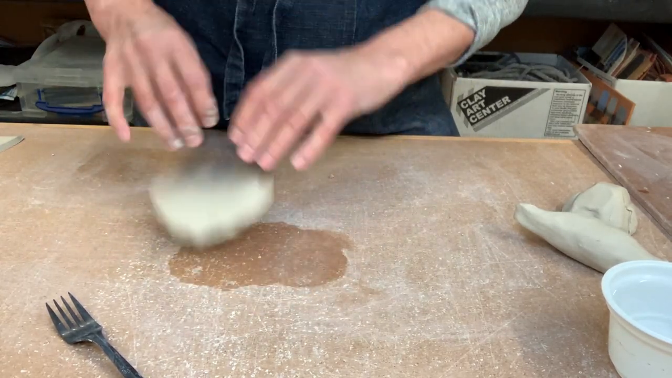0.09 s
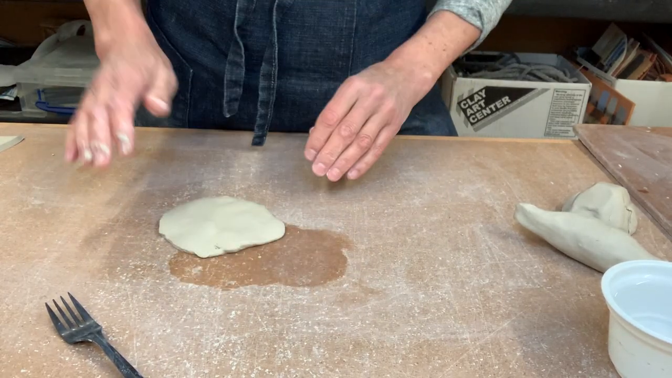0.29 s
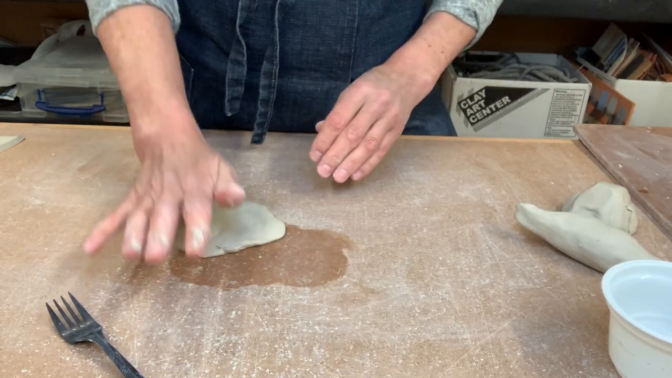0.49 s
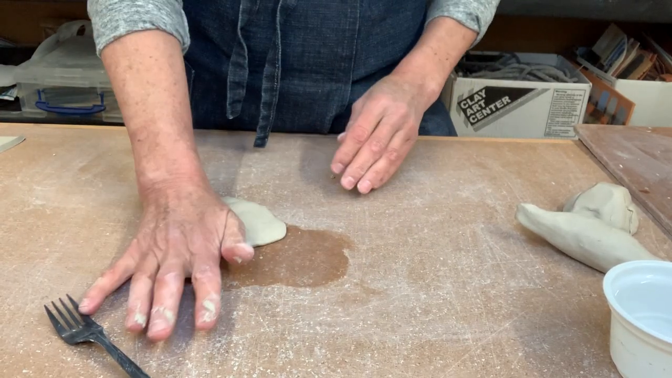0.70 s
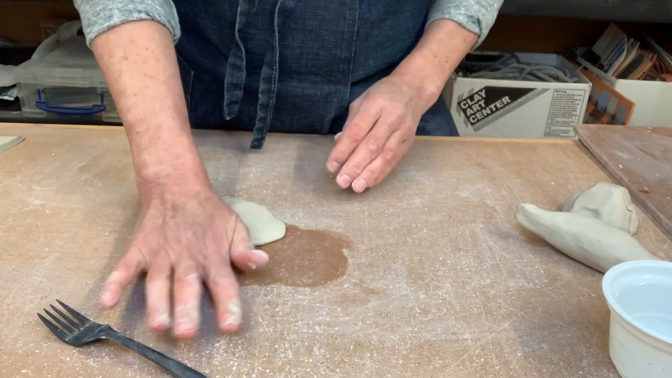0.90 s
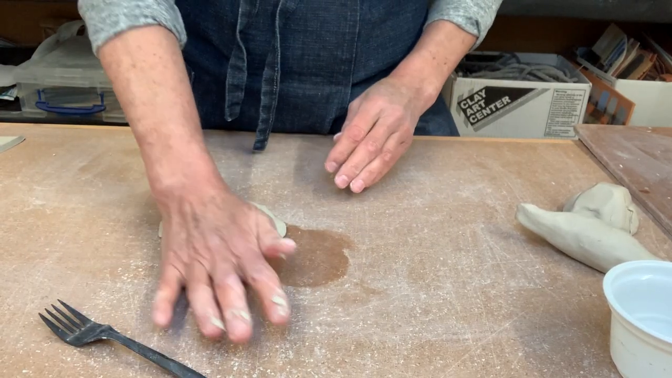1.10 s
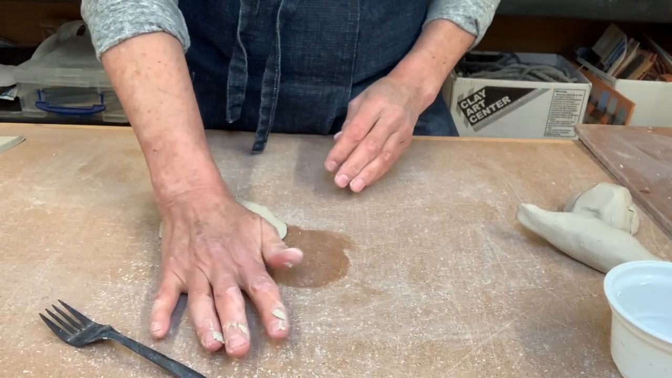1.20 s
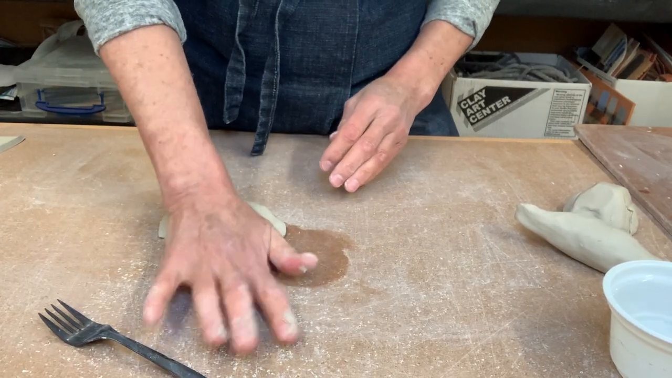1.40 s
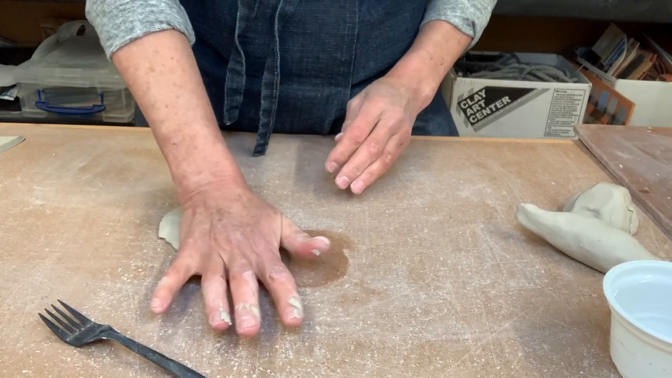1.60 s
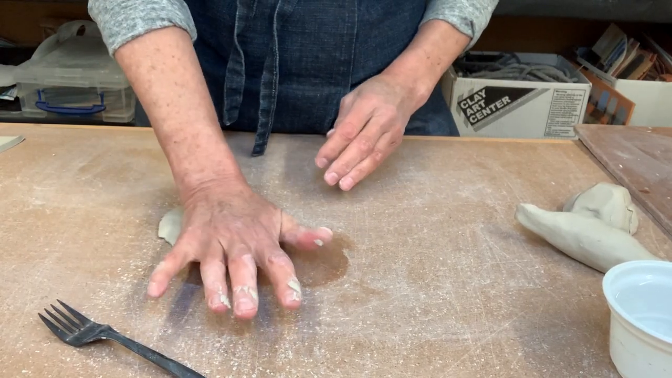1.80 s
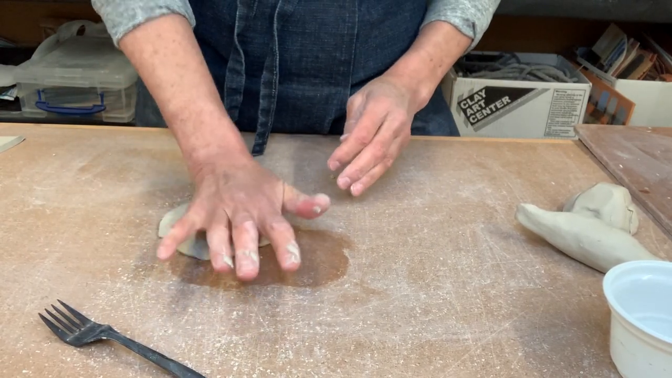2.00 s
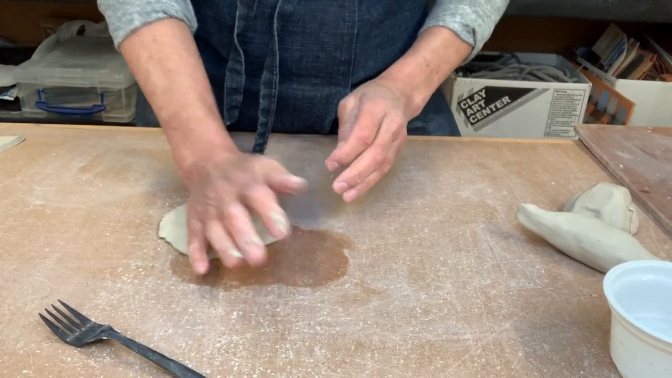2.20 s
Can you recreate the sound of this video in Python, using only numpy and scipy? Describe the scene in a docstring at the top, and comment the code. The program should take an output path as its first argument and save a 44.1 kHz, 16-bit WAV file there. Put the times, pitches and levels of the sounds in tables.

```python
"""Palm slap on moist clay, with a rattled fork

A bare palm slaps a lump of moist clay on a wooden work table, close to the microphone in a small workshop.
The slap layers a wet noise crack, a falling sine pop of trapped air, the ringing hollow of the hand and a thud
of table modes. As the hand presses, with a faint hiss of rubbing, a finger nudges a plastic fork, which clicks
back onto the table in quickening bounces. Light noise-burst pats follow, over a low rumble of coloured noise."""
import sys
import numpy as np
from scipy import signal
from scipy.fft import rfft, irfft
from scipy.io import wavfile
from scipy.ndimage import uniform_filter1d

SR = 44100
rng = np.random.default_rng(int(sys.argv[2]) if len(sys.argv) > 2 else 0)


def dump_mix(stems):
    """Bounce the given channels to the path in sys.argv[1] as a 16-bit WAV at rate SR."""
    frames = np.atleast_2d(stems).T  # one column per channel
    limited = np.clip(frames, -1, 1)  # hard clip at full scale
    pcm = np.round(limited * 32767).astype(np.int16)
    wavfile.write(sys.argv[1], SR, pcm)


N = 97020  # length in samples, 2.2 s


def undb(db):
    """Turn decibels into an amplitude factor."""
    return 10 ** (np.asarray(db) / 20)


def clock():
    """Time of every sample in seconds."""
    return np.arange(N) / SR


def high_pass(x, hz, order):
    """Roll off what lies below a frequency."""
    sos = signal.butter(order, hz, "high", fs=SR, output="sos")
    return signal.sosfilt(sos, x + 1e-18)


def colour(points, tilt_db=0):
    """Gain at every frequency, drawn through (f/Hz, level/dB) points, plus a tilt in dB per octave."""
    hz, db = np.array(points, float).T
    octave = np.log2(np.fft.rfftfreq(N, 1 / SR) + 1)  # +1 keeps the logarithm finite at 0 Hz
    curve_db = np.interp(octave, np.log2(hz), db)
    return undb(curve_db + tilt_db * np.maximum(octave, np.log2(hz[0])))


def noise(points):
    """Steady noise shaped by a colour and scaled to rms 1."""
    x = irfft(rfft(rng.standard_normal(N)) * colour(points), N)
    return x / x.std()


EVEN_WIDTH_HZ = 450  # width of each of the two smoothing passes over the power spectrum


def burst(at, rise, decay, gain):
    """A spray of tiny contacts: noise that swells to rms 1 at a given moment and dies away, evenly coloured."""
    t = clock() - at
    fall = np.where(t < 0, -t / rise, t / decay)
    envelope = np.exp(-np.minimum(fall, 20))
    spray = rfft(envelope * rng.standard_normal(N))
    # divide out the random humps of the spectrum before colouring it
    width = int(EVEN_WIDTH_HZ * N / SR)
    power = uniform_filter1d(uniform_filter1d(np.abs(spray) ** 2, width), width)
    x = irfft(spray * gain / np.sqrt(power), N)
    return x * np.sqrt(np.sum(envelope ** 2) / np.sum(x ** 2))


def ring(modes, at=0):
    """Struck resonances: sines that start at a given moment and each fall 60 dB in their t60."""
    t = np.maximum(clock() - at, 0)
    out = 0
    for hz, db, t60 in modes:
        out = out + undb(db) * np.sin(2 * np.pi * hz * t) * np.exp(-np.log(1000) * t / t60)
    return out


RIGHT_LAG_S = .00016  # rounded to whole samples


def place(x, pan_db=0):
    """Stereo position left of centre: earlier on the left, and louder there by pan_db."""
    late = np.interp(clock() - round(RIGHT_LAG_S * SR) / SR, clock(), x)
    return np.array([x * undb(pan_db / 2), late * undb(-pan_db / 2)])


ALIKE_BELOW_HZ = 230


def diffuse(a, b):
    """Two noises as sound from all round: alike in the bass, unrelated in the treble."""
    side = high_pass(b, ALIKE_BELOW_HZ, order=1)
    return np.array([a + side, a - side]) / np.sqrt(2)


# colour of the steady room rumble: f/Hz, relative level/dB (per Hz)
RUMBLE_COLOUR = [(20, -12), (50, -1.5), (80, 0.5), (122, 4), (180, -8.5), (260, -7), (360, -19.5),
                 (600, -26.5), (1000, -32), (1800, -33.5), (3400, -36), (6500, -44.5), (12000, -42),
                 (16000, -46)]
RUMBLE_DB = -62.5


def rumble():
    """Steady, mostly low noise of the room, arriving from all round."""
    return undb(RUMBLE_DB) * diffuse(noise(RUMBLE_COLOUR), noise(RUMBLE_COLOUR))


# workshop reverberation by band: f/Hz, early reflection level/dB, tail level/dB, tail t60/s
ROOM_BANDS = [(60.4, -23, -17, .65), (125, -16.5, -11, 1), (250, -12, -13, 0.34), (494, -12.5, -21, .38),
              (1000, -6.5, -14.5, 0.3), (2013.5, -11, -14.5, .44), (4000, -9.5, -8.5, 0.42),
              (8000, -11, -10, .32), (14000, -13.5, -17.5, 0.35)]
EARLY_T60_S, FIRST_ECHO_S = 0.13, .005


def workshop(x):
    """Dense early reflections and a short tail: decaying noise, band by band, convolved with the source."""
    t = np.maximum(clock() - FIRST_ECHO_S, 0)
    field = rfft(diffuse(*rng.standard_normal((2, N))))
    octave = np.log2(np.fft.rfftfreq(N, 1 / SR) + 1)
    centres = np.log2([row[0] for row in ROOM_BANDS])

    def fade(t60):
        """Exponential decay of unit energy, silent until the first echo."""
        unit_energy = np.sqrt(2 * np.log(1000) / (t60 * SR))
        return (t > 0) * np.exp(-np.log(1000) * t / t60) * unit_energy

    echo = 0
    # each band crossfades into its neighbours
    for share, (hz, early_db, tail_db, t60) in zip(np.eye(len(ROOM_BANDS)), ROOM_BANDS):
        band = irfft(field * np.interp(octave, centres, share), N)
        early = undb(early_db) * fade(EARLY_T60_S)
        tail = undb(tail_db) * fade(t60)
        echo = echo + band * np.hypot(early, tail)
    return signal.fftconvolve(x[None], echo, axes=1)[:, :N]


# loudness of skin rubbing on clay and table while the hand presses: t/s, level/dB
RUB_LEVELS = [(0, -95.5), (0.419, -87), (0.579, -73), (.70, -79.5), (.90, -75), (1.05, -65), (1.16, -96.5),
              (1.29, -75.5), (1.42, -101), (1.8, -98), (2.08, -82.5), (2.2, -84)]
# colour of the rubbing: f/Hz, relative level/dB (per Hz)
RUB_COLOUR = [(200, -15.5), (700, -0.5), (1200, 1), (1800, 0), (2600, -7.5), (4000, -8), (6500, -15.5),
              (12000, -22), (16000, -16)]


def rub():
    """Faint hiss of the pressing hand: friction as diffuse noise that swells and sinks."""
    level = undb(np.interp(clock(), *np.array(RUB_LEVELS).T))
    return level * diffuse(noise(RUB_COLOUR), noise(RUB_COLOUR))


# light touches of palm and fingers: t/s, level/dB, rise/s, decay/s, tilt/dB per octave
PAT_TOUCHES = [(1.476, -59, 0.0096, 0.0075, 2.35), (1.656, -57, 0.0025, .006, -4),
               (1.929, -59.5, 0.013, 0.0088, 0.5), (2.1112, -44.5, 0.00039, 0.0067, -1.6)]
# colour of a pat before its tilt: f/Hz, relative level/dB (per Hz)
PAT_COLOUR = [(100, 9.5), (350, 1), (700, 2), (1200, -4.5), (2200, -1), (4000, -6.5), (6200, -12.5),
              (8500, -29), (12000, -19.5), (16000, -37)]


def pats():
    """Soft puffs of skin meeting or leaving the clay, each a short coloured noise burst."""
    out = 0
    for at, db, rise, decay, tilt_db in PAT_TOUCHES:
        out = out + undb(db) * burst(at, rise, decay, colour(PAT_COLOUR, tilt_db))
    return place(out, pan_db=5)


# the nudged fork tips and bounces to rest: t/s, level/dB, extra click level/dB (brightness)
FORK_LANDINGS = [(0.787, -16, -1), (0.9404, 0.5, -0.5), (.9970, -2.5, 1), (1.0274, -11.5, -10),
                 (1.0443, -20.5, -10.5)]
# modes of the plastic fork before a random detune: f/Hz, level/dB, t60/s
FORK_MODES = [(1110, -34, 0.016), (1320, -24, .012), (1645, -26.5, 0.0098), (2107, -28, 0.0077),
              (3540, -19.5, .003), (5530, -30.5, 0.0037)]
# colour of the contact click: f/Hz, relative level/dB (per Hz)
CLICK_COLOUR = [(150, -9), (400, -15), (1300, -3), (2400, -5), (3500, 1.5), (4600, -13), (5600, -9),
                (7000, -18), (9300, -3), (11000, -0.5), (12500, -19.5), (14500, -7.5), (17000, -18)]
CLICK_DB, CLICK_RISE_S, CLICK_DECAY_S = -24, 0.00028, 0.00077
FORK_LAG_S, FORK_RISE_S, FORK_CUT_HZ = 0.00019, 0.00028, 880
FORK_DETUNE = 0.018  # standard deviation, as a share of each mode frequency


def fork():
    """Each landing gives a hard click and rings the light plastic briefly; the last bounces are duller."""
    clicks, body = np.zeros((2, N))
    for at, db, bright_db in FORK_LANDINGS:
        click = burst(at, CLICK_RISE_S, CLICK_DECAY_S, colour(CLICK_COLOUR))
        clicks += undb(CLICK_DB + db + bright_db) * click
        # every landing excites slightly different pitches
        detune = 1 + FORK_DETUNE * rng.standard_normal(len(FORK_MODES))
        modes = [(hz * k, level, t60) for (hz, level, t60), k in zip(FORK_MODES, detune)]
        start = at + FORK_LAG_S
        onset = 1 - np.exp(-np.maximum(clock() - start, 0) / FORK_RISE_S)
        body += undb(db) * onset * ring(modes, start)
    return place(clicks + high_pass(body, FORK_CUT_HZ, order=2), pan_db=2.5)


# blows and shoves that reach the table top: t/s, strength level/dB, contact length/s
TABLE_PUSHES = [(0.2087, 2, .004), (.270, -11, 0.006), (.368, -20, 0.0069), (0.751, -31.5, 0.013),
                (0.944, -35, 0.0032), (1.212, -26, 0.013), (1.484, -29, 0.0056), (1.660, -20.5, 0.016),
                (1.873, -32.5, 0.0067), (1.934, -36.5, 0.0046), (2.112, -31.5, 0.0038), (2.122, -2.5, .016)]
# modes of the wooden table top: f/Hz, level/dB, t60/s
TABLE_MODES = [(56, -20.5, 0.32), (78, -33.5, 0.32), (90.45, -23, 0.45), (112.9, -16.5, 0.086),
               (127.26, -35, .3), (195, -19, .04), (217, -31, 0.38), (228.5, -36.5, 0.39), (262, -25, 0.23)]
TABLE_CUT_HZ = 46


def table():
    """Each push rings the table top; a long soft contact reaches only its lowest modes, with the deep bass cut."""
    force = np.zeros(N)
    for at, db, length in TABLE_PUSHES:
        push = np.sin(np.pi * np.clip((clock() - at) / length, 0, 1)) ** 2
        force += undb(db) * push / push.sum()
    thuds = signal.fftconvolve(force, ring(TABLE_MODES))[:N]
    return place(high_pass(thuds, TABLE_CUT_HZ, order=4))


# colour of the wet crack: f/Hz, relative level/dB (per Hz)
CRACK_COLOUR = [(150, -12), (500, -0.5), (900, -2.5), (1400, -3.5), (1850, 4), (2900, 2), (4300, -2.5),
                (6000, -6.5), (8000, -15), (10800, -0.5), (14000, -8), (17000, -16.5)]
# hollow of the cupped hand: f/Hz, level/dB, t60/s
HOLLOW_MODES = [(510, -21, .04), (807.7, -20.5, 0.058), (1203, -20.5, 0.063), (1784, -16.5, .024)]
# SLAP_S is the moment of full contact; the hollow rings a moment after it
SLAP_S, CRACK_DB, CRACK_RISE_S, CRACK_DECAY_S = .2058, -9, .0011, 0.0014
POP_S, POP_FROM_HZ, POP_TO_HZ, POP_FALL_S = .2050, 2119.4, 95, .0040
POP_DB, POP_RISE_S, POP_DECAY_S, POP_PAN_DB = -9.5, .0012, 0.0082, 6
HOLLOW_S, HOLLOW_PAN_DB = .2072, 6.5


def slap():
    """Wet crack of skin on clay, a pop of trapped air falling in pitch as the clay flattens, and the hand's ring."""
    crack = undb(CRACK_DB) * burst(SLAP_S, CRACK_RISE_S, CRACK_DECAY_S, colour(CRACK_COLOUR))

    t = np.maximum(clock() - POP_S, 0)
    hz = POP_TO_HZ + (POP_FROM_HZ - POP_TO_HZ) * np.exp(-t / POP_FALL_S)
    phase = 2 * np.pi * np.cumsum(hz * (t > 0)) / SR
    envelope = (1 - np.exp(-t / POP_RISE_S)) * np.exp(-t / POP_DECAY_S)
    pop = undb(POP_DB) * np.sin(phase) * envelope

    hollow = ring(HOLLOW_MODES, HOLLOW_S)
    return place(crack) + place(pop, POP_PAN_DB) + place(hollow, HOLLOW_PAN_DB)


FORK_ROOM_DB, PAT_ROOM_DB = -6, -7  # reverb sends


def scene():
    """Hand, clay, fork and table in the workshop, over its rumble."""
    blow = slap() + table()
    clatter = fork()
    light = pats()
    sent = blow + undb(FORK_ROOM_DB) * clatter + undb(PAT_ROOM_DB) * light
    room = workshop(sent[0])  # the left channel feeds the reverb
    return blow + clatter + light + rub() + room + rumble()


LOW_CUT_HZ, TOP_HZ = 27, 16500


def record(dry):
    """The microphone drops the deepest bass and the very top."""
    low_pass = signal.ellip(8, .2, 70, TOP_HZ, fs=SR, output="sos")
    return signal.sosfilt(low_pass, high_pass(dry, LOW_CUT_HZ, order=2))


dry = scene()
out = record(dry)
dump_mix(out)
```